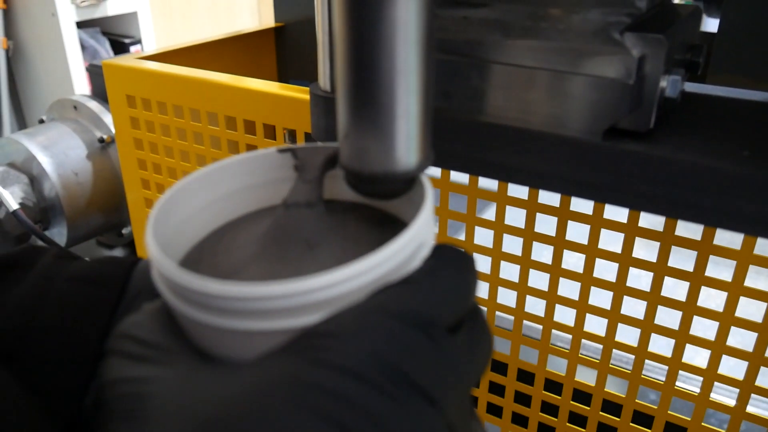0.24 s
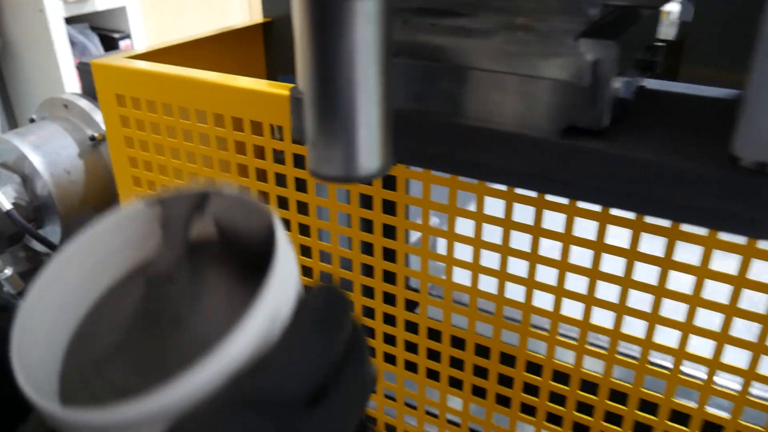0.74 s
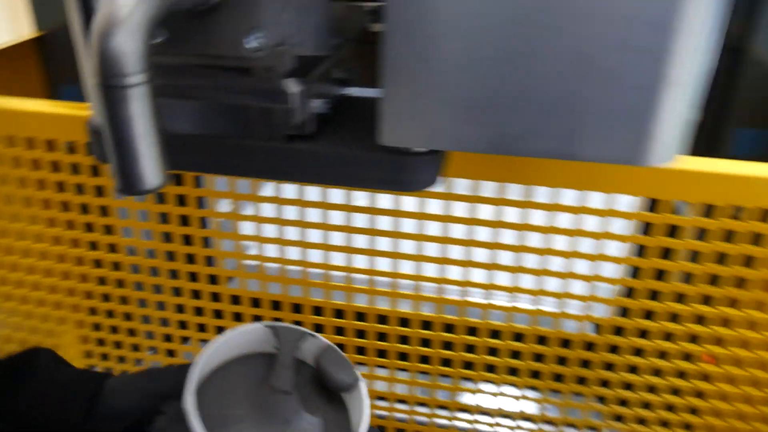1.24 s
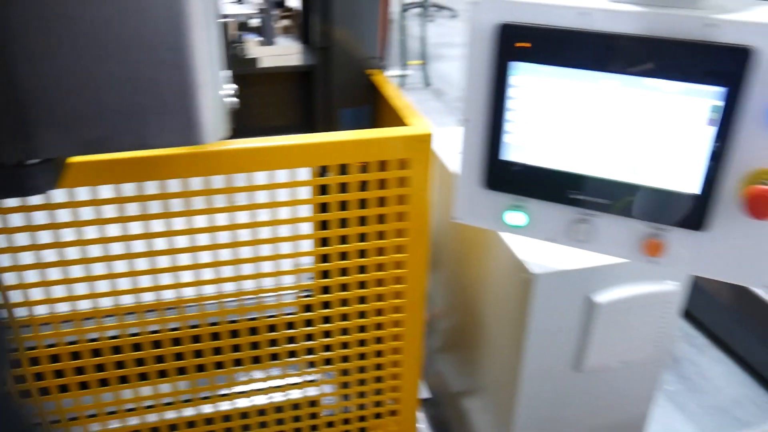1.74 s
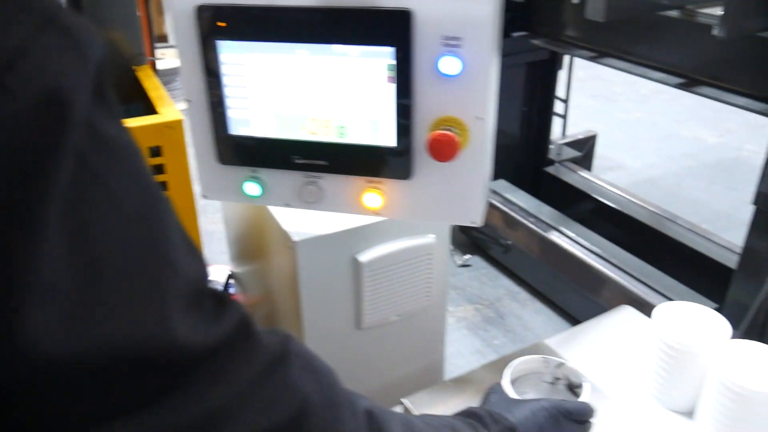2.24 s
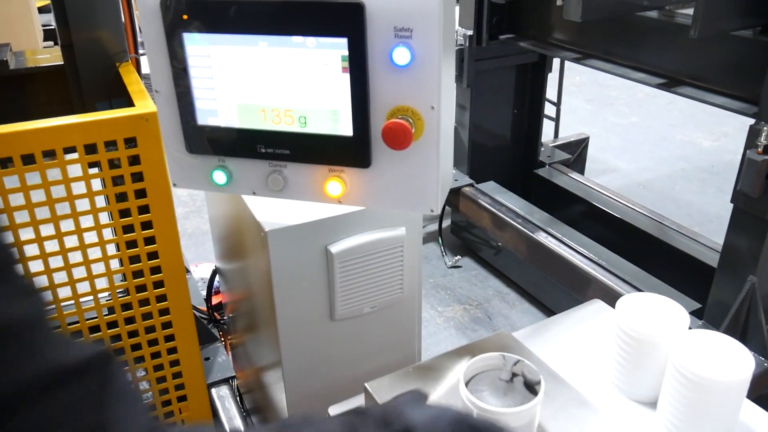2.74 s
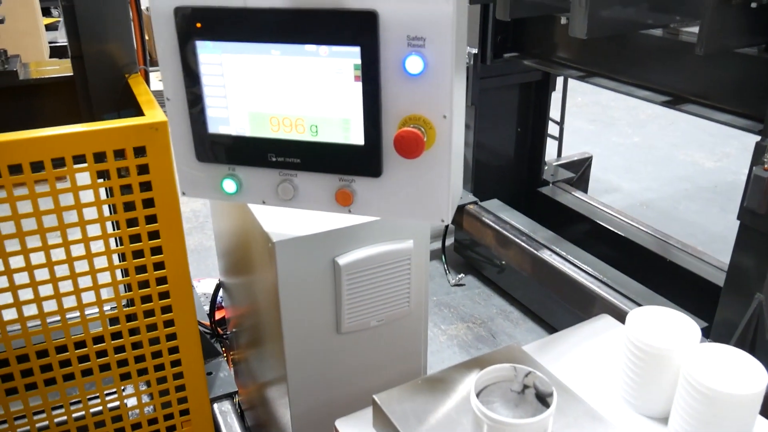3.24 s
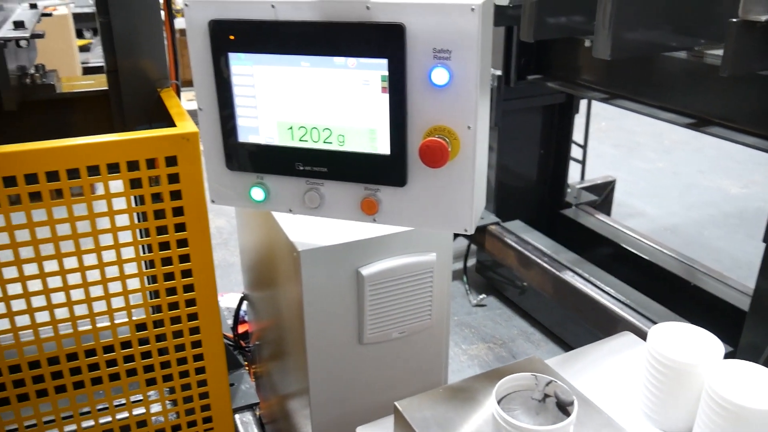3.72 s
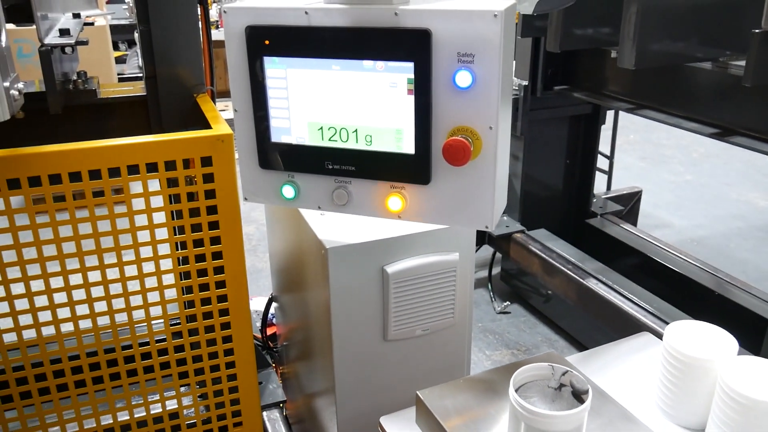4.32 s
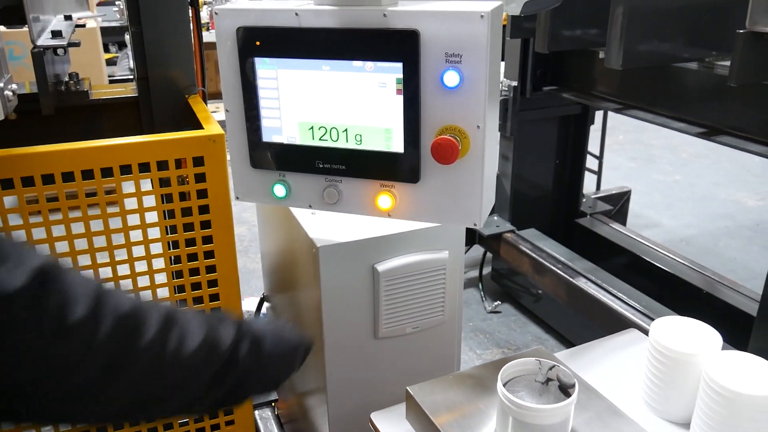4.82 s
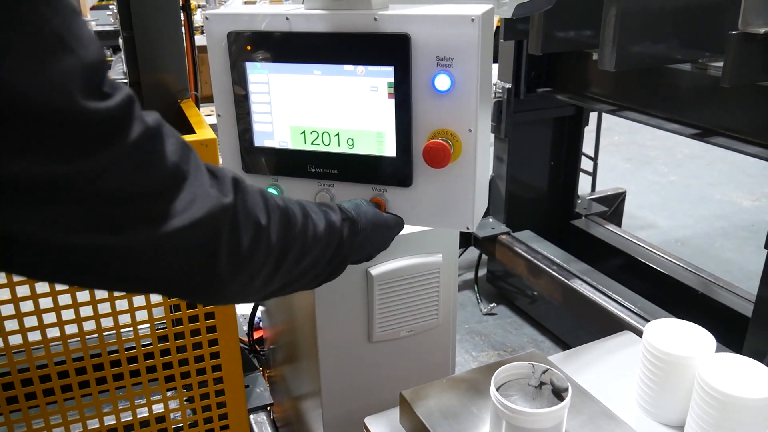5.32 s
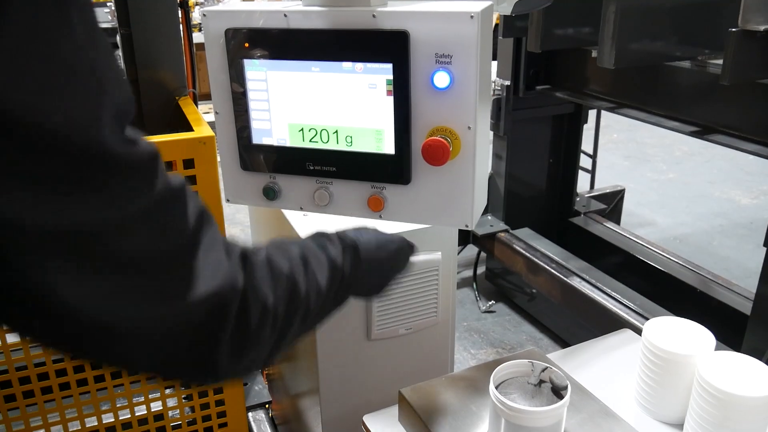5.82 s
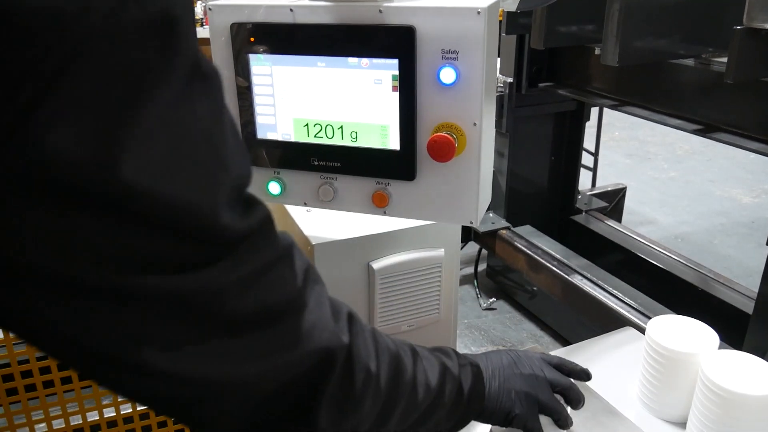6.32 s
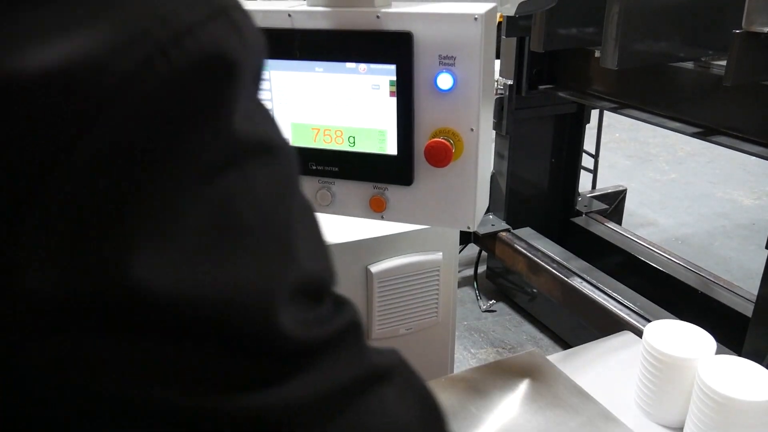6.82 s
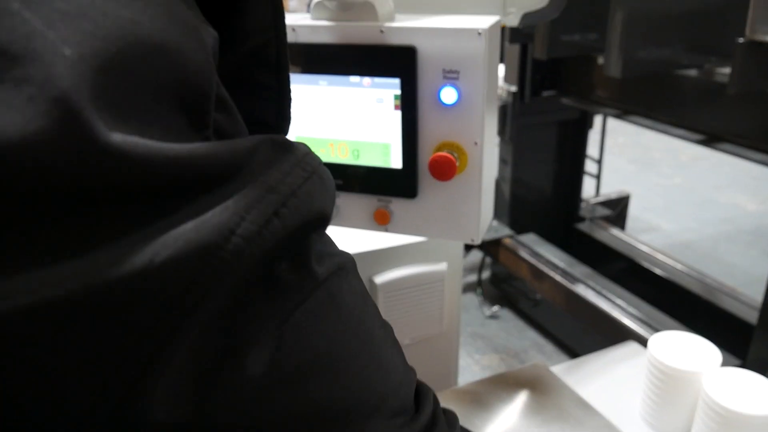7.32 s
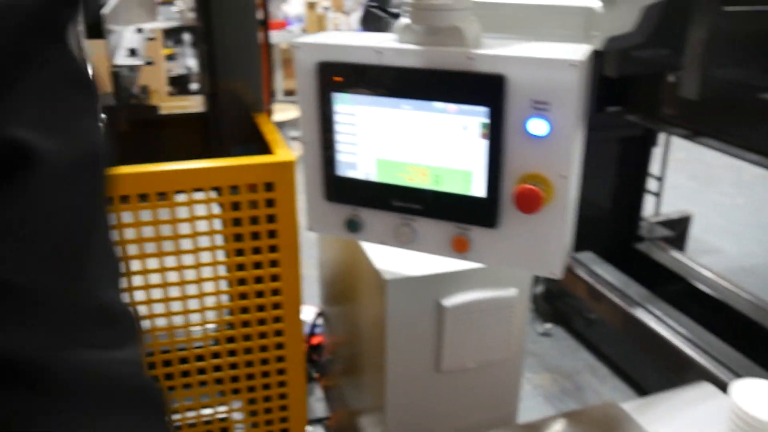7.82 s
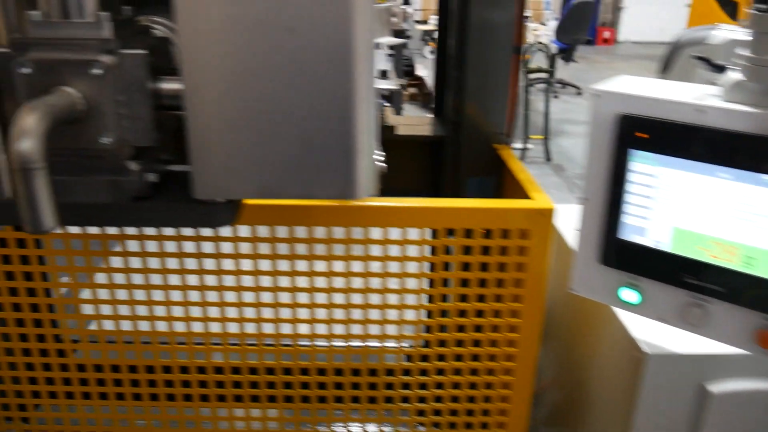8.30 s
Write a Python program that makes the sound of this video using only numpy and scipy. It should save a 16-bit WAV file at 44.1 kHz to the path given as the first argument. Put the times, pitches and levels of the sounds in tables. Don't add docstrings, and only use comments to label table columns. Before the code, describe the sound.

Steady machine hum around a low-mid pitch with fan and air-leak hiss; liquid gurgles into a cup, a valve snaps, later cup thuds on metal.

```python
import sys
import numpy as np
from scipy import signal
from scipy.fft import irfft, next_fast_len
from scipy.io import wavfile
from scipy.ndimage import uniform_filter1d

SR = 44100
rng = np.random.default_rng(int(sys.argv[2]) if len(sys.argv) > 2 else 0)


def ratio_of_db(decibels):
    return 10 ** (np.asarray(decibels, float) / 20)


def unload_wav(signal):
    wavfile.write(
        sys.argv[1],
        SR,
        np.round(np.clip(np.atleast_2d(signal).T, -1, 1) * 32767).astype(np.int16),
    )


N = 377487
TIME = np.arange(N) / SR
SIZE = next_fast_len(N)
FREQ = np.fft.rfftfreq(SIZE, 1 / SR) + 1e-3
VANE_HZ, VANES = 224.6, 9


def between(ends, share):
    return ends[0] + (ends[1] - ends[0]) * share


def bumps(table):
    s, db, half, *more = np.transpose(table)
    return np.array([db, *more]) @ np.exp(-((TIME - s[:, None]) / half[:, None]) ** 2)


def fits(s, db, half):
    return ratio_of_db(db) * np.exp(-((TIME - s) / half) ** 2)


def colour(table, hz):
    table_hz, db = np.transpose(table)
    return np.interp(np.log(hz), np.log(table_hz), db)


def walk(rate):
    k = int(SR / rate)
    held = np.repeat(rng.standard_normal(N // k + 1), k)
    return 1.34 * uniform_filter1d(uniform_filter1d(held, k), k)[:N]


def hiss(shape, side_db):
    chance = rng.standard_normal((4, len(FREQ)))
    mid = irfft(shape * (chance[0] + 1j * chance[1]), SIZE)[:N]
    side = irfft(shape * ratio_of_db(side_db) * (chance[2] + 1j * chance[3]), SIZE)[:N]
    return np.array([mid + side, mid - side]) / np.std(mid)


def wide(noise, side):
    return noise[0] + side * noise[1] * np.array([[1], [-1]])


def rings(table):
    return np.sqrt(sum(ratio_of_db(2 * db) / w / (1 + (2 * (FREQ - hz) / w) ** 2) ** 2 for hz, w, db in table))


def pan(x, pan_db):
    left = 2 / (1 + ratio_of_db(-pan_db))
    return x * np.array([left + 0 * TIME, 2 - left + 0 * TIME])


def tone(hz, db, pan_db, skew=0.21):
    gap = skew * walk(0.697)
    phase = 2 * np.pi * (hz * TIME + rng.random())
    return pan(np.sqrt(2) * ratio_of_db(db) * np.sin([phase + gap, phase - gap]), pan_db)


def modes(table, t):
    return sum(ratio_of_db(db - 60 * t / t60) * np.sin(2 * np.pi * hz * t) for hz, db, t60 in table)


def bandpass(order, low_hz, high_hz, x):
    return signal.sosfilt(signal.butter(order, [low_hz, high_hz], "bandpass", fs=SR, output="sos"), x)


def add(out, s, x):
    i = int(s * SR)
    out[:, i:i + x.shape[-1]] += x[..., :N - i]


# time_s, step_to_panel (0-1), turn_to_panel (0-1), leak_in_view (0-1)
MIC = [(0, 0.06, 0, 0.51), (.35, 0.19, 0.01, 0.6), (.7, 0.22, 0.03, 0.91), (1.05, 0.16, 0, 0.74),
       (1.3, 0.44, 0.06, 0.41), (1.5, 0.59, 0.24, 0.13), (1.7, 0.52, 0.42, .03), (2.24, 0.75, 0.84, 0.08),
       (2.5, 0.87, 0.87, 0), (2.9, 0.92, 0.9, 0.03), (3.9, 1, 0.93, 0.23), (4.8, 1, 0.89, 0.18),
       (5.2, 0.94, 1, 0.08), (7.2, 0.88, 1, 0.14), (8.1, 1, 0.76, 0.01), (8.27, 0.62, 0.76, 0.63),
       (8.42, 0.46, 0.76, 0.52), (8.56, 0.56, 0.78, 0.56)]


def microphone():
    s, *columns = np.transpose(MIC)
    return [np.interp(TIME, s, c) for c in columns]


# centre_hz, half_width_hz, change_db
REFLECTION_MARKS = [(1222, 44, -3), (1428, 25, -0.5), (1887, 32, -4), (2175, 30, -8), (2660, 70, -3), (3540, 70, -4),
                    (4930, 60, -1), (6530, 140, -3), (8350, 30, -5), (8880, 60, -4.5), (9630, 40, -4.5),
                    (10200, 40, -1.5), (12270, 150, -1.5), (13150, 120, 3), (14600, 30, -3.5),
                    (3950, 30, 3.5), (4373, 25, 3.5), (6836, 50, 5.5), (7020, 25, 5), (7960, 120, 1.5),
          (8370, 57, 2.5), (8460, 30, 4.5), (8850, 65, 1), (9530, 80, 3), (10450, 50, 3), (10670, 50, 0),
          (11130, 37, 1.5), (11430, 30, 3), (12960, 35, 4.5), (13750, 100, 2), (14830, 66, 2),
          (15080, 80, 5)]


def reflections():
    ripple_rms_db, ripple_hz = 1.3, 25.5
    ripple = uniform_filter1d(rng.standard_normal(len(FREQ)), int(ripple_hz * SIZE / SR))
    marks = sum(db * np.exp(-((FREQ - hz) / half) ** 2) for hz, half, db in REFLECTION_MARKS)
    return ripple_rms_db * ripple / np.std(ripple) + marks


# freq_hz, side_minus_mid_db
HALL_COLOUR = [(25, -17), (75, -8), (135, -3), (250, 5), (350, 8), (470, 9), (700, 3.5), (1230, -1),
               (1500, -2), (2550, -4), (3100, -1), (3480, 0.5), (3900, 0.5), (6000, 1), (10000, 1),
               (11900, -4), (12400, -8.5), (13300, -11), (15000, -13)]
HALL_SIDE = [(30, -7.5), (120, -7.5), (400, -4), (900, -2.5), (2000, -4), (5000, -10), (9000, -7.5),
             (15000, 1)]
# freq_hz, width_hz, level_db (over the hall)
FAN_RINGS = [(353.7, 100, -13), (532.6, 34, -18), (937, 210, -8.5), (1400, 69, -15), (2054, 230, -7.5),
             (1830.2, 31.3, -12.5), (2272.6, 30, -13), (2824.4, 18.3, -11), (3681.5, 90, -4.5),
             (3852.5, 55, -6.5), (7442, 740, -2), (8480, 45, -11.5), (9120, 70, -7.5), (9966, 150, -9)]
# freq_hz, width_hz, level_db
CASING = [(4343, 20.9, -2.5), (4463, 40, -16), (4347, 384, 3.5)]
DUCT = [(5672, 87, -6.5), (5847, 220, -8.5), (6178, 140, -11), (5306, 300, -14.5)]
# freq_hz, width_hz, level_db
LATE_RINGS = [(4200, 32, -1), (4690, 45, -5), (5733, 28, -4.5), (5434, 25, -1.5), (6000, 40, 1)]
# nozzle_db, panel_db
HALL_LAYERS = [
    (-45.5, -44),
    (-45, -42),
    (-48, -40),
    (-48.5, -39.5),
]
HALL_PAN_DB = -1, 2.5
# time_s, change_db, half_length_s
RUMBLE_SWELLS = [(0, -6, 0.26), (.74, 5, 0.23), (1.88, 5.5, 0.175), (2.5, 3.5, 0.23), (7.35, 2, 0.21),
                 (8.0, 3, 0.31)]
HISS_SWELLS = [(0, 5.33, 0.393), (1.8, 0.62, 0.52), (7.8, 0.88, 0.48), (8.56, 3.38, 0.24)]
CASING_SWELLS = [(.15, 3, .35), (.78, 4, 0.078), (1.8, 2, 0.052), (2.12, 6, 0.061), (3.4, 0.5, 0.29),
                 (4.6, 0.5, .4), (7.95, -6.5, 0.175), (8.35, 4.5, 0.13)]
DUCT_SWELLS = [(1.7, -9, 0.089), (2.29, -4, .08), (3.3, -2, 0.26), (3.82, 3.5, 0.11), (7.38, -1, .15),
               (7.92, -3.5, 0.14), (8.37, 1, 0.115)]
# time_s, change_db, half_length_s
CASING_BLUR = [(2.6, 1.5, 1.2), (6.0, -3.5, 1.9), (8.4, -4, .4)]


def hall():
    _, turn, _ = microphone()
    swells = RUMBLE_SWELLS, HISS_SWELLS, CASING_SWELLS, DUCT_SWELLS
    levels = [between(ends, turn) + bumps(s)[0] for ends, s in zip(HALL_LAYERS, swells)]
    rumble_db, broad_db, casing_db, duct_db = levels
    side_db = colour(HALL_SIDE, FREQ)
    spectrum = ratio_of_db(colour(HALL_COLOUR, FREQ) + reflections())
    out, swell = 0, walk(3.13)
    for hz in 32 * 2 ** np.arange(9.5):
        octave = np.clip(1 - np.abs(np.log2(FREQ / hz)), 0, 1)
        shape = np.sqrt(octave) * spectrum
        bass_db = (rumble_db - broad_db + 0.5) * (hz < 600)
        size = np.sqrt(np.mean(shape ** 2) * 14.7)
        out = out + size * ratio_of_db(bass_db + .55 * swell + .5 * walk(8)) * hiss(shape, side_db)
    for hz, width, db in FAN_RINGS:
        bass_db = (rumble_db - broad_db) * (hz < 600)
        out = out + ratio_of_db(db + bass_db + 1.3 * walk(2)) * hiss(rings([(hz, width, 0)]), side_db)
    narrow = ratio_of_db(bumps(CASING_BLUR)[0] - 0.5) * hiss(rings(CASING[:1]), side_db)
    casing = ratio_of_db(casing_db - 1.5) * (hiss(rings(CASING[1:]), side_db) + narrow)
    duct = ratio_of_db(duct_db + 1.5) * hiss(rings(DUCT), side_db)
    late_db, rise_s = -49, 5.8
    late = ratio_of_db(late_db + 1.2 * walk(2.5)) / (1 + np.exp((rise_s - TIME) / .25))
    late = late * hiss(rings(LATE_RINGS), side_db)
    return pan(ratio_of_db(broad_db) * out + casing + duct + late, between(HALL_PAN_DB, turn))


# time_s, change_db, half_length_s
SHAFT_SWELLS = [(1.2, -2, .4), (8.2, 6, .5)]


def passing():
    return bumps(SHAFT_SWELLS)[0]


# freq_hz, nozzle_db, panel_db
MAINS = [(200.1, -42.5, -48.5), (495.9, -54, -42.5), (1339.1, -56, -51.5), (1360.5, -60, -57),
         (1451.1, -66, -61), (1455.9, -66, -61), (1541.8, -66, -62), (1951.6, -66, -61), (2117, -66, -62)]
# freq_hz, level_db
LOW_TONES = [(75.2, -67), (124.8, -69), (149.7, -68), (249.6, -60), (269.5, -56), (723.7, -58),
             (873.4, -60), (585, -60)]
# time_s, change_db, half_length_s
NODES_WHISTLE = [(0, -8.5, 0.185), (1.07, -5, .35), (1.5, -0.5, 0.118), (2.33, -6.5, 0.184),
                 (2.9, -7.5, 0.315), (4.8, -8, 0.88), (6.4, -5, 1), (7.5, -9.5, 0.285), (8.3, -3.5, 0.21)]


def cabinet():
    _, turn, _ = microphone()
    swell_db = passing()
    out = ratio_of_db(-48 + bumps(NODES_WHISTLE)[0]) * hiss(rings([(1346.8, 23.3, 0)]), -5.5)
    for hz, db in LOW_TONES:
        out += tone(hz, db + 1.5 * walk(1.5), 0., 0.37)
    for hz, *ends in MAINS:
        out += tone(hz, between(ends, turn) + swell_db * (hz > 1000) + 0.98 * walk(1.5), 0.)
    return out


GEAR_ORDERS = 32, 45, 59
GEAR_DB = (-45, -45.5, -48)
# time_s, change_db, half_length_s
NODES_32 = [(0, -5, 0.225), (.83, 0, 0.153), (1.57, -7.5, 0.104), (2.9, -4, .35), (3.7, -8.5, 0.59),
            (4.7, -6, .45), (5.9, -4.5, 0.76), (7.6, -4, 0.26), (8.3, 5, 0.22)]
NODES_45 = [(.35, -8.5, 0.4), (.85, -9.5, 0.24), (1.55, -14.5, 0.335), (1.98, -12, 0.235),
            (3.0, -5.5, 0.25), (3.7, -6.5, 0.62), (5.4, -1, 0.32), (8.56, -14, 0.305)]
NODES_59 = [(.35, -16, .35), (.83, -16, .14), (1.74, -4, .12), (2.31, -7.5, 0.167), (3.7, -22, 0.42),
            (5.2, -16.5, 0.67), (6.3, -14, .5), (7.3, -4, 0.35), (8.33, 7.5, 0.3)]
SHAFT_ORDERS = 4, 26, 37, 63, 72, 108, 135, 144, 162, 171
SHAFT = [(-64, 0, 1.5), (-55, 0, 2), (-53, 2, 2), (-57, 2, 2), (-54, 2, 2), (-57, 2, 2), (-54, 2, 2),
         (-59, 2, 2), (-53, 2, 2), (-57, 2, 2)]
NOZZLE_ORDERS = 12, 19, 20, 23, 28, 30, 34, 46, 55, 60, 71, 81, 90, 130
NOZZLE_ORDERS_DB = [(-60, -47.5), (-58, -47.5), (-53, -51), (-51, -62), (-60, -54), (-62, -56), (-54, -58),
                    (-66, -60), (-62, -59), (-66, -63), (-66, -62), (-64, -61), (-72, -62), (-66, -62)]


def shaft():
    _, turn, _ = microphone()
    swell_db, shaft_hz = passing(), VANE_HZ / VANES
    out = np.zeros((2, N))
    gear_nodes = NODES_32, NODES_45, NODES_59
    lift_db, pans_db, wanders_db = (4., .6, .6), (6., 2.5, 2.5), (.4, .6, .5)
    for order, db, nodes, lift, pan_db, wander_db in zip(
            GEAR_ORDERS, GEAR_DB, gear_nodes, lift_db, pans_db, wanders_db):
        level_db = db + lift + bumps(nodes)[0] + wander_db * walk(1.58)
        out += tone(order * shaft_hz, level_db, pan_db, 0.18)
    for order, (db, pan_db, wander_db) in zip(SHAFT_ORDERS, SHAFT):
        level_db = db + swell_db * (order in SHAFT_ORDERS[1:5]) + wander_db * walk(1.58)
        out += tone(order * shaft_hz, level_db, pan_db, 0.18)
    for order, ends in zip(NOZZLE_ORDERS, NOZZLE_ORDERS_DB):
        level_db = between(ends, turn) + swell_db * (order > 24) + 1.6 * walk(2.2)
        out += tone(order * shaft_hz, level_db, 0., 0.28)
    return out


# nozzle_db, panel_db, nozzle_left_minus_right_db, panel_left_minus_right_db
VANE_TONES = [
    (-35.5, -31.5, -1.5, 5),
    (-28, -15.5, 5, -0.18),
    (-32, -31, -2.5, -1),
    (-33.5, -33.5, 5.5, 3.5),
]
# time_s, change_db, half_length_s, shift_left_db
NODES_1 = [(.35, -7, 0.19, -3), (1.4, 1.5, 0.4, -3.5), (2.05, 4, 0.4, -1), (2.9, 1, 0.55, -0.5),
           (6.398, 0, .5, 0), (8.2, 2.5, .45, -1.5)]
NODES_2 = [(0, -0.5, 0.42, -0.5), (.72, 0.5, 0.21, 4.5), (1.17, -1, 0.496, -9), (1.74, 0, 0.101, 4.5),
           (1.95, -2.5, 0.167, -4.5), (2.22, -0.5, 0.296, -4), (3.4, 0., 0.89, 1), (8.45, 0., 0.19, -3.5)]
NODES_3 = [(0, -4, 0.34, 0.8), (1.0, -2.5, 0.154, 5.5), (1.42, -12, 0.23, -9.5), (2.02, -11.5, 0.174, 18.5),
           (2.26, -3, 0.11, -10), (3.55, -3, 0.65, -7.5), (4.35, -5, 0.39, -11), (5.15, -12.5, 0.54, -21),
           (6.0, -7, 0.45, -7.5), (6.82, -4.5, 0.38, -2.5), (7.95, -6, 0.515, -5.5), (8.56, -9, 0.33, -6)]
NODES_4 = [(.05, -10.5, 0.415, -7), (.7, -8.5, 0.346, -10.5), (1.26, -6, 0.32, -6), (1.7, -2, 0.24, 6),
           (2.5, -6.5, 0.247, 3.5), (3.41, -14.5, 0.39, 7), (5.4, -10, 0.453, 1.5), (6.85, -0.5, 0.083, 0.),
           (7.28, -12, 0.34, 5), (8.1, -8.5, 0.164, -2), (8.34, 0., 0.16, 17)]


def vanes():
    step, turn, _ = microphone()
    shares = turn, step, turn, turn
    all_nodes = NODES_1, NODES_2, NODES_3, NODES_4
    wanders = (0.13, 9.6), (0.06, 2.5), (0.18, 7.6), (0.55, 7.2)  # dB, per s
    skews = 0.053, 0.016, 0.21, 0.21
    out = np.zeros((2, N))
    for i, (ends, share, nodes) in enumerate(zip(VANE_TONES, shares, all_nodes)):
        change_db, shift_db = bumps(nodes)
        wander_db, rate = wanders[i]
        level_db = between(ends[:2], share) + change_db + wander_db * walk(rate)
        pan_db = between(ends[2:], turn) + shift_db
        out += tone((i + 1) * VANE_HZ, level_db, pan_db, skews[i])
    return out


# freq_hz, level_db (per Hz)
LEAK_COLOUR = [(900, -36), (2500, -35), (3600, -15.5), (6400, -0.5), (7400, -3.5), (10000, 1), (12000, -3),
               (13500, -7.5), (15300, -17)]
# freq_hz, width_hz, level_db
LEAK_RINGS = [(3647, 110, -23.5), (4495, 210, -10.5), (7475, 220, -6.5), (8730, 48, -11)]


def leak():
    _, _, view = microphone()
    jet = hiss(ratio_of_db(colour(LEAK_COLOUR, FREQ)), -12.0)
    whistle = hiss(rings(LEAK_RINGS), -22.0) * ratio_of_db(-6.5)
    return view * ratio_of_db(-29.5 + 1.0 * walk(11.0)) * (jet + whistle)


# time_s, peak_db
SQUEAKS = [
    (.975, -36.5),
    (7.85, -37.5),
    (8.44, -33.5),
]


def squeaks():
    return hiss(rings([(8490, 35, 0)]), -8.) * sum(fits(s, db, 0.024) for s, db in SQUEAKS)


# time_s, peak_db, half_length_s, pitch_hz
GULPS = [(.025, -42, .02, 1320), (.06, -45, .015, 1310), (.11, -45, .02, 1330), (.28, -43, .025, 1330),
         (.34, -43, .02, 1350), (.44, -41, .02, 1320), (.5, -43, .03, 1310), (.2, -44, .03, 940),
         (.39, -43, .025, 930), (.52, -43, .015, 930), (.61, -41, .02, 560), (.66, -38, .02, 530),
         (.665, -41, .02, 590), (.15, -44, .03, 510), (.22, -43, .02, 520), (.38, -43, .04, 500),
         (.09, -45, .03, 310), (.35, -42, .02, 240)]


def gulps():
    s, db, half, hz = np.transpose(GULPS)[:, :, None]
    t = TIME[:SR] - s
    swell = np.sqrt(2) * ratio_of_db(db) * np.exp(-(t / half) ** 2)
    out = np.zeros((2, N))
    add(out, 0, np.sum(swell * np.sin(2 * np.pi * hz * t * (1 + .2 * t)), axis=0))
    return out


# freq_hz, level_db (per Hz)
FLOW = [(500, -18), (900, -3), (1500, -5.5), (2500, -6), (3300, -13.5), (4500, 0.5), (6000, -13)]
# freq_hz, width_hz, level_db
FLOW_RINGS = [(2464, 90, -2), (2863, 110, -4), (3400, 80, -3), (3530, 140, 0.5)]


def liquid():
    flow = ratio_of_db(-37.5 + 2.0 * walk(14.45)) * hiss(ratio_of_db(colour(FLOW, FREQ)), -19.5)
    column = ratio_of_db(-39.5 - 15 * TIME + 2 * walk(10)) * hiss(rings(FLOW_RINGS), -10.5)
    cup = ratio_of_db(-42.5 + 3.17 * walk(15.8)) * hiss(rings([(236.4, 38.5, 0)]), -15.5)
    return (flow + column + cup) * (TIME < .72)


# time_s, peak_db, half_length_s
CHATTER = [(.05, -47, .035), (.14, -48, .02), (.25, -40, .018), (.32, -45, .02), (.4, -41, .022),
           (.54, -43, .025), (.63, -44, .03)]
# freq_hz, width_hz, level_db
CHATTER_RINGS = [(970, 50, -2.5), (1120, 35, 0), (1280, 40, -3)]


def chatter():
    ringing = .45 * hiss(rings(CHATTER_RINGS), -5.0) + tone(CHATTER_RINGS[1][0], -1.5, 0.)
    return ratio_of_db(5.0) * sum(fits(*row) for row in CHATTER) * ringing * (TIME < .72)


# time_s, peak_db, t60_s
VALVE = [
    (.7163, -14.5, .03),
    (.7205, -19.5, .06),
    (.7235, -16, .07),
    (.727, -16, .07),
    (.731, -17, .09),
]
# freq_hz, level_db, t60_s
VALVE_MODES = [(4000, -5, 0.104), (5020, -8, .1), (7180, 2.5, 0.08), (8725, 6, 0.04), (11650, 0, 0.067),
               (14800, 0, .08)]


def valve():
    out, t = np.zeros((2, N)), TIME[:SR // 4]
    for s, db, t60 in VALVE:
        air = bandpass(1, 7000., 17000., rng.standard_normal((3, len(t))))
        air = ratio_of_db(6.5) * air * (1 - np.exp(-t / .0003))
        linger = bandpass(2, 3600., 4250., air[2]) * ratio_of_db(-60 * t / 0.185 + 4.0)
        linger = linger * (1 - np.exp(-t / 0.0067))
        burst = wide(air[:2], .5) * ratio_of_db(-60 * t / t60 - 2.0)
        add(out, s, ratio_of_db(db) * (burst + linger + 0.315 * modes(VALVE_MODES, t)))
    return out


# time_s, peak_db, hardness_hz, depth_hz, ring (0-1)
KNOCKS = [(.61, -33, 800, 520, .5), (.64, -29, 800, 520, .6), (.662, -32, 800, 520, .5),
          (0.693, -38.5, 420, 199, 0.6), (0.631, -29.5, 270, 190, 0.76), (.708, -29, 270, 180, .6),
          (0.718, -32.5, 900, 140, 0.02), (.868, -31.5, 520, 380, 0.52), (2.494, -19.5, 653, 320, 0.75),
          (2.5, -26.5, 1495, 800, .6), (2.503, -29.5, 200, 115, 1), (2.512, -24.5, 700, 260, 0.57),
          (2.526, -29, 800, 300, .4), (7.167, -14, 476, 130, 0.68), (7.176, -26, 330, 110, 0.93),
          (7.184, -20.5, 900, 330, .6), (7.191, -20, 900, 400, 0.54), (7.2, -17, 400, 150, 0.7),
          (7.212, -27, 400, 110, .7), (7.225, -24, 380, 120, .7), (7.238, -19.5, 300, 170, .7)]
# freq_hz, level_db, t60_s
PLATE = [(140, -9.5, 0.4), (188.7, -8.5, 0.21), (258.6, -2, 0.202), (354.2, -1.5, 0.15), (400, 3.5, 0.063),
         (520, 3, 0.028), (900, -14, 0.061), (1232, -19, .05)]


def knocks():
    out, t = np.zeros((2, N)), TIME[:SR // 2]
    for s, db, hard_hz, low_hz, ring in KNOCKS:
        rattle, tick = rng.standard_normal((2, 2, len(t)))
        rattle = wide(rattle, .4) * ratio_of_db(-60 * t / (.15 * ring) + 2.)
        plate = modes(PLATE, t) * ratio_of_db(-60 * t * (1 / ring - 1) / 0.084)
        body = bandpass(3, low_hz, hard_hz, plate + rattle)
        tick = bandpass(2, hard_hz, 2.5 * hard_hz, tick[0]) * ratio_of_db(-60 * t / .07 + 1.)
        add(out, s, ratio_of_db(db) * (body + tick))
    return out


def scene():
    machine = hall() + cabinet() + shaft() + vanes()
    filling = leak() + squeaks() + gulps() + liquid() + chatter()
    return machine + filling + valve() + knocks()


# time_s, depth_db, recovery_s
DUCKS = [
    (0.722, -8.5, 0.116),
    (7.172, -3, 0.077),
]


def gain_control(x):
    duck_db = 0
    for s, db, back in DUCKS:
        since = np.maximum(TIME - s, 0)
        duck_db = duck_db + db * (1 - np.exp(-since / 0.0015)) * np.exp(-since / back)
    return x * ratio_of_db(duck_db)


def band_limit(x):
    return signal.sosfilt(signal.butter(12, 16430, fs=SR, output="sos"), x)


def record(dry):
    notch_hz, notch_width_hz, top_hz = 7850, 82, 16000
    notched = signal.lfilter(*signal.iirnotch(notch_hz, notch_hz / notch_width_hz, SR), gain_control(dry))
    dulled = signal.sosfilt(signal.ellip(10, .3, 60, top_hz, fs=SR, output="sos"), notched)
    return band_limit(dulled)


dry = scene()
out = record(dry)
unload_wav(out)
```